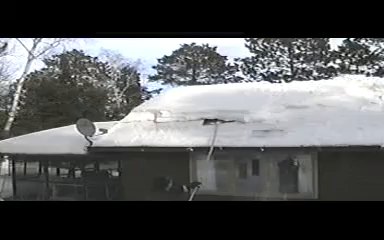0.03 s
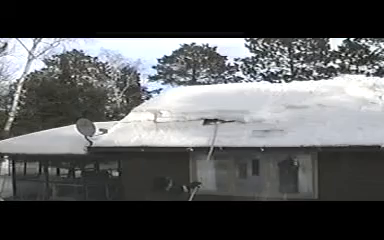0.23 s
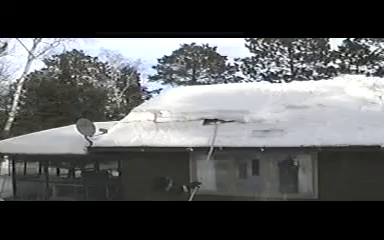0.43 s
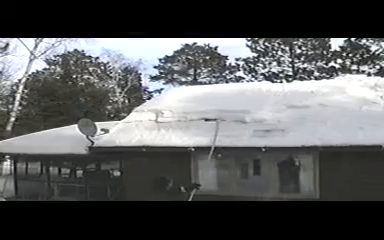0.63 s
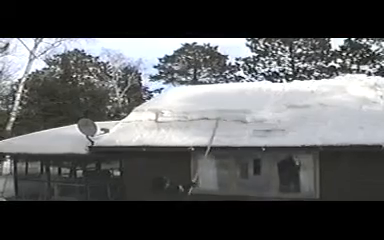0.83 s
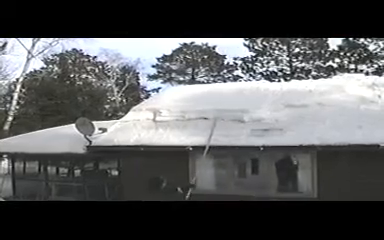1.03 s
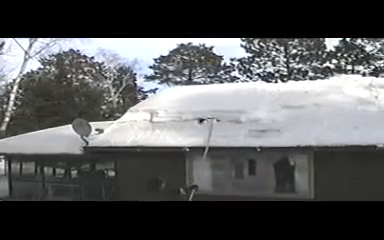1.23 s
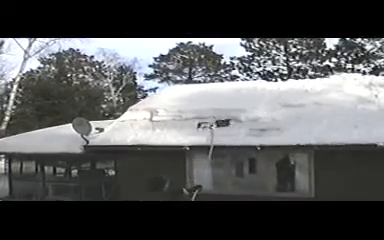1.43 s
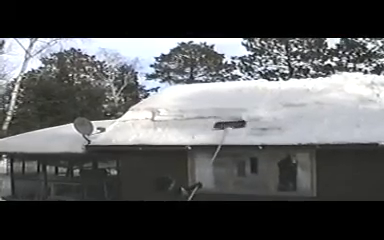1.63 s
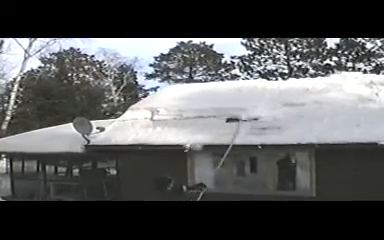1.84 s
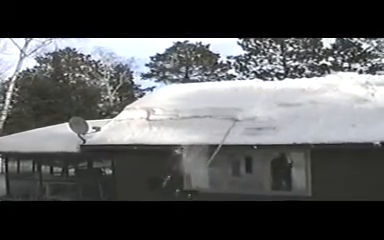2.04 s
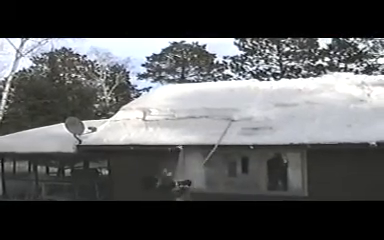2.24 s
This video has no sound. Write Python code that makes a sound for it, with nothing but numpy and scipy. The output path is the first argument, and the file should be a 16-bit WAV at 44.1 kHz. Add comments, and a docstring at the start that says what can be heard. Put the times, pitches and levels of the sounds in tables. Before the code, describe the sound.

Crunchy scraping of a long rake across a snowy roof, with knocks and soft thuds.

```python
"""Roof rake in crusted snow

From the yard, the microphone hears a long-handled rake drag through crusted snow on a house roof.
The blade crunches, rings and bumps over the shingles, loose snow hisses off and clumps thud down.
Faint wind and a small motor's hum lie underneath; the sound cuts out completely twice near the start."""
import sys
import numpy as np
from scipy import signal
from scipy.fft import rfft, irfft, next_fast_len
from scipy.io import wavfile

SR = 44100
rng = np.random.default_rng(int(sys.argv[2]) if len(sys.argv) > 2 else 0)


def int16_out(signal):
    """Quantize to a 16-bit WAV file."""
    q = np.round(np.clip(np.atleast_2d(signal).T, -1, 1) * 32767)
    wavfile.write(sys.argv[1], SR, q.astype(np.int16))


N = 101429
TIME = np.arange(N) / SR

# wind in the trees: frequency_hz, gain_db
WIND_SPECTRUM = [(25, -11), (45, -11), (100, -13), (200, -1), (350, -1.5), (650, -1.5), (1200, -9),
                 (2500, -10.5), (4200, -10), (6000, -27.5), (12000, -32.5)]
# partials of the motor near the microphone: pitch_hz, rms_db
MOTOR_PARTIALS = [(23, -66.5), (60, -66.5), (72, -60.5), (120, -65.5), (180, -67.5), (300, -55.5)]
# reflections off wall and ground: delay_s, gain_db
YARD_ECHOES = [(0.0214, -14), (.047, -16)]

# clumps landing on the ground: start_s, level_db
CLUMP_LANDINGS = [(0.475, -42.5), (0.555, -42), (0.745, -44), (0.82, -42), (0.868, -46), (1.575, -43),
                  (2.075, -40.5), (2.11, -46.5)]
# their dull thud: frequency_hz, gain_db
CLUMP_SPECTRUM = [(60, -33), (130, -4.5), (190, -1), (280, -1.5), (500, -13.5), (1500, -14.5)]
# puffs of powder off the blade: peak_s, level_db
POWDER_PUFFS = [(0.455, -58), (0.745, -42.5), (0.77, -45.5), (1.92, -48)]
# their airy treble: frequency_hz, gain_db
POWDER_SPECTRUM = [(5000, -19), (7500, 2), (10500, -2), (13000, -22)]
# sliding snow, one list for each pull or push: time_s, relative_level_db
HISS_STROKES = [
    [(0.108, -32.5), (0.182, -36), (0.216, -30.5), (0.228, -34.5)],
    [(0.412, -30), (0.504, -39.5), (0.564, -33.5), (0.626, -35.5), (0.77, -33), (0.794, -46),
     (0.888, -54.5), (0.93, -61)],
    [(1.05, -57.5), (1.154, -46.5), (1.382, -44.5), (1.406, -40), (1.544, -44.5), (1.594, -38),
     (1.628, -48.5), (1.645, -43)],
    [(1.655, -38.5), (1.809, -35.5), (1.837, -39.5), (2.005, -40), (2.019, -32), (2.037, -49), (2.091, -53),
     (2.3, -54.5)],
]
# its bright hiss: frequency_hz, gain_db
HISS_SPECTRUM = [(1500, -6.5), (3500, 2), (5000, -1.5), (6000, 3.5), (7300, -0.5), (8500, -5.5),
                 (10000, -9.5), (11300, -11.5), (13000, -26.5)]

# resonances of blade and pole: pitch_hz, width_hz, lift_db
RAKE_RESONANCES = [(352.5, 38, 5.5), (539, 15, 5), (633, 32, 3), (774, 22, 2), (921, 71, 4), (1158, 30, 4),
                   (1274, 74, 3.5), (1502, 45, 4), (1650, 35, 6), (1884, 88, 1.5), (2033, 30, 2.5),
                   (2500, 110, 5), (3000, 17, 1), (3206, 93, 8), (3820, 100, 7), (4566, 86, 7)]
# larger pieces of crust giving way: start_s, level_db
CRUST_SNAPS = [(0.414, -18), (0.554, -25.5), (0.671, -26.5), (1.004, -37), (1.652, -29), (1.692, -25.5),
               (1.808, -30), (1.948, -27), (2.018, -35.5)]
# their sharp crack: frequency_hz, gain_db
SNAP_SPECTRUM = [(400, -11.5), (1000, 0), (2500, -0.5), (6000, -13), (12000, -32.5)]
# the blade hitting the roof: start_s, level_db
ROOF_BUMPS = [(0.115, -25), (0.14, -30), (0.201, -30), (0.411, -24.5), (0.553, -21.5), (0.567, -26),
              (1.565, -20.5), (1.580, -32), (1.591, -22.5), (1.734, -28), (1.805, -27)]
# its hollow knock: frequency_hz, gain_db
BUMP_SPECTRUM = [(130, -29), (300, 0.5), (700, 4), (1600, -4), (3000, -12), (6000, -25.5), (12000, -45)]
# the blade scraping, one list for each pull or push: time_s, relative_level_db
SCRAPE_STROKES = [
    [(0.108, -23), (0.116, -22.5), (0.148, -21), (0.168, -28), (0.202, -17), (0.228, -21)],
    [(0.412, -16), (0.416, -15.5), (0.512, -28), (0.572, -22), (0.626, -33), (0.718, -26), (0.802, -36),
     (0.93, -46.5)],
    [(1.05, -44), (1.146, -38), (1.378, -37), (1.44, -29), (1.552, -37), (1.568, -23.5), (1.645, -34.5)],
    [(1.655, -25), (1.661, -28), (1.813, -20), (1.853, -30), (1.965, -33.5), (1.979, -34.5), (2.023, -28.5),
     (2.055, -39.5), (2.3, -41)],
]
# its crunch: frequency_hz, gain_db
SCRAPE_SPECTRUM = [(130, -30.5), (250, -11.5), (450, -7), (700, 1), (1100, -3), (2000, -2.5), (2900, -9),
                   (4200, -16), (5500, -19), (12000, -48.5)]

# faint stereo width, mostly in the treble: frequency_hz, gain_db
WIDTH_SPECTRUM = [(30, -5), (70, -14), (200, -17.5), (500, -15.5), (1000, -9.5), (2000, 9.5), (4000, 3.5),
                  (8000, 4), (12000, 7)]
# stretches when the sound is present: start_s, end_s, fade_in_s
LIVE_SPANS = [(.1025, .2295, .006), (.4098, 2.4, .0006)]


def from_db(db):
    """Decibels to gain."""
    return 10 ** (np.asarray(db) / 20)


def unit_rms(x):
    """Scale to an rms of 1."""
    return x / np.sqrt(np.mean(x ** 2) + 1e-20)


def delayed(x, delay_s):
    """The same sound arriving later."""
    return np.pad(x, (int(delay_s * SR), 0))[:N]


def drift(rate_hz):
    """Smooth random motion with an rms of 1."""
    pole = np.exp(-2 * np.pi * rate_hz / SR)
    motion = signal.lfilter([1], [1, -2 * pole, pole * pole], rng.standard_normal(N + SR))
    return unit_rms(motion[SR:])


def coloured(x, spectrum):
    """Shape x with a minimum-phase filter, so nothing rings ahead of a click; rms 1."""
    size = 2 * next_fast_len(N)
    hz, db = np.transpose(spectrum)
    bins_hz = np.maximum(np.fft.rfftfreq(size, 1 / SR), 1)
    skirts = np.minimum(bins_hz / hz[0], 1) ** 2 * np.minimum(hz[-1] / bins_hz, 1) ** 2
    gain = skirts * from_db(np.interp(np.log(bins_hz), np.log(hz), db))
    cepstrum = irfft(np.log(gain))
    cepstrum[1:size // 2] *= 2  # folding onto positive time makes the filter causal
    cepstrum[size // 2 + 1:] = 0
    response = np.exp(rfft(cepstrum))
    return unit_rms(irfft(rfft(x, size) * response)[:N])


def noise(spectrum):
    """Steady coloured noise; rms 1."""
    return coloured(rng.standard_normal(N), spectrum)


def grains(clicks_per_s, friction_share, spread_db=4.5):
    """Random clicks of uneven size over smooth friction noise."""
    sizes = from_db(spread_db * np.minimum(rng.exponential(1, N), 4))
    signs = rng.choice([-1, 1], N)
    clicks = unit_rms(sizes * signs * (rng.random(N) < clicks_per_s / SR))
    return np.sqrt(1 - friction_share) * clicks + np.sqrt(friction_share) * rng.standard_normal(N)


def stroke_envelope(strokes, gain_db):
    """Gain gliding through the rake's pulls and pushes."""
    time_s, level_db = np.vstack(strokes).T
    return from_db(np.interp(TIME, time_s, level_db) + gain_db)


def strike_envelope(strikes, attack_s, t60_s):
    """Gain of events that swell quickly and die away."""
    envelope = np.zeros(N)
    for start_s, level_db in strikes:
        age_s = np.maximum(TIME - start_s, 0)
        rise = np.minimum(age_s / attack_s, 1)
        decay_db = 60 * np.maximum(age_s - attack_s, 0) / t60_s
        envelope += rise * from_db(level_db - decay_db)
    return envelope


def wind():
    """Light wind in the trees, faint behind the rake."""
    return from_db(-41) * noise(WIND_SPECTRUM)


def motor_hum(waver_db=1.5):
    """A small motor hums near the microphone, each partial wavering in level."""
    hum = np.zeros(N)
    for pitch_hz, rms_db in MOTOR_PARTIALS:
        amplitude = np.sqrt(2) * from_db(rms_db + waver_db * drift(rate_hz=6.8))
        hum += amplitude * np.sin(2 * np.pi * (pitch_hz * TIME + rng.random()))
    return hum


def across_yard(direct):
    """The direct sound reaches the microphone first, then echoes off wall and ground."""
    return direct + sum(from_db(db) * delayed(direct, delay_s) for delay_s, db in YARD_ECHOES)


def falling_clumps():
    """Clumps of snow land below the roof with soft, dull thuds."""
    return strike_envelope(CLUMP_LANDINGS, attack_s=0.0048, t60_s=0.28) * noise(CLUMP_SPECTRUM)


def powder_spray(width_s=0.023):
    """Fine powder sprays off the blade in brief airy swells."""
    swells = sum(from_db(db) * np.exp(-((TIME - peak_s) / width_s) ** 2) for peak_s, db in POWDER_PUFFS)
    return swells * noise(POWDER_SPECTRUM)


def sliding_snow(judder):
    """Up on the roof, ice crystals rub past each other in a fine bright hiss."""
    crystals = grains(clicks_per_s=8300, friction_share=0.57) * judder
    return stroke_envelope(HISS_STROKES, gain_db=1) * coloured(crystals, HISS_SPECTRUM)


def rake_ring(x):
    """Blade and pole resonate, lifting narrow bands of whatever excites them; rms 1."""
    for pitch_hz, width_hz, lift_db in RAKE_RESONANCES:
        radius = np.exp(-np.pi * width_hz / SR)
        zeros = np.array([1, 0, -1]) * (1 - radius ** 2) / 2
        poles = [1, -2 * radius * np.cos(2 * np.pi * pitch_hz / SR), radius ** 2]
        x = x + (from_db(lift_db) - 1) * signal.lfilter(zeros, poles, x)
    return unit_rms(x)


def crust_snaps():
    """Larger pieces of crust give way with sharp cracks that ring the rake."""
    return strike_envelope(CRUST_SNAPS, attack_s=0.001, t60_s=0.051) * rake_ring(noise(SNAP_SPECTRUM))


def blade_bumps():
    """The blade hits the shingles with short hollow crunches."""
    return strike_envelope(ROOF_BUMPS, attack_s=0.0028, t60_s=0.083) * rake_ring(noise(BUMP_SPECTRUM))


def blade_scrape(judder):
    """The crust breaks against the blade in dense tiny cracks."""
    cracks = grains(clicks_per_s=2500, friction_share=0.46) * judder
    crunch = rake_ring(coloured(cracks, SCRAPE_SPECTRUM))
    return stroke_envelope(SCRAPE_STROKES, gain_db=-0.5) * crunch


def scene():
    """The roof as heard from the yard, in a stereo image that is nearly mono."""
    judder = from_db(drift(rate_hz=100))  # stick and slip shakes crunch and hiss together by about 1 dB
    raking = blade_scrape(judder) + sliding_snow(judder) + powder_spray()
    impacts = blade_bumps() + crust_snaps() + falling_clumps()
    mid = across_yard(raking + impacts) + motor_hum() + wind()
    width = from_db(-41.5) * mid.std() * coloured(delayed(mid, delay_s=0.005), WIDTH_SPECTRUM)
    return np.array([mid + width, mid - width])


def record(dry, cutoff_hz=13450):
    """The sound drops to silence outside the live spans, and the top treble is cut."""
    live = np.zeros(N)
    for start_s, end_s, fade_in_s in LIVE_SPANS:
        live += np.clip((TIME - start_s) / fade_in_s, 0, 1) * (TIME < end_s)
    lowpass = signal.cheby2(16, 60, cutoff_hz, fs=SR, output="sos")
    return signal.sosfilt(lowpass, dry * live)


dry = scene()
out = record(dry)
int16_out(out)
```